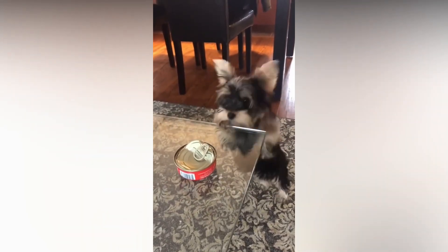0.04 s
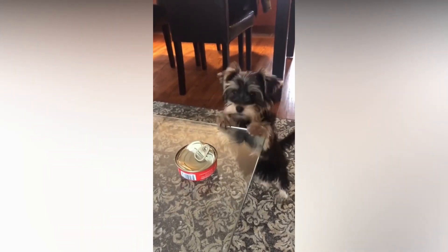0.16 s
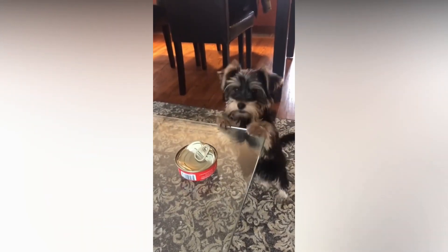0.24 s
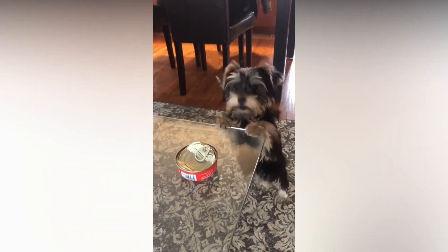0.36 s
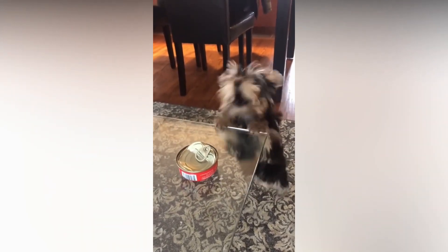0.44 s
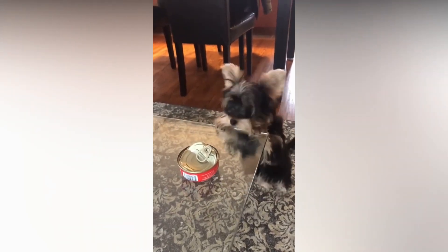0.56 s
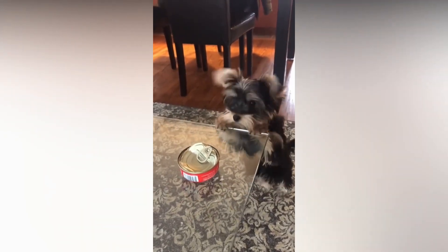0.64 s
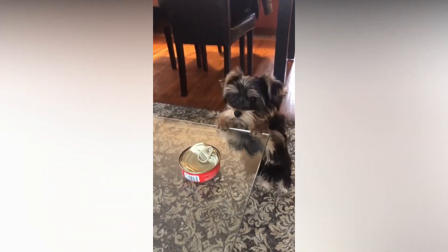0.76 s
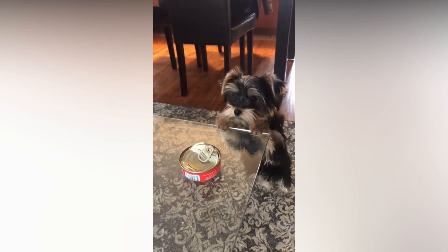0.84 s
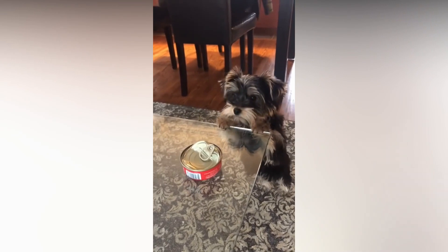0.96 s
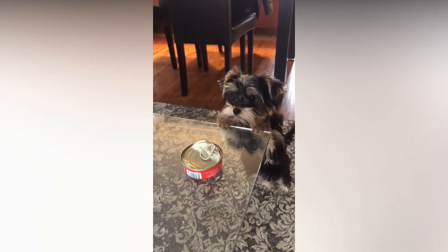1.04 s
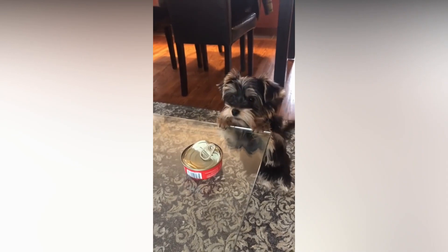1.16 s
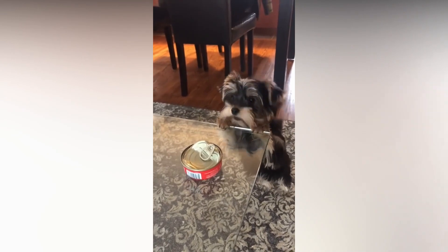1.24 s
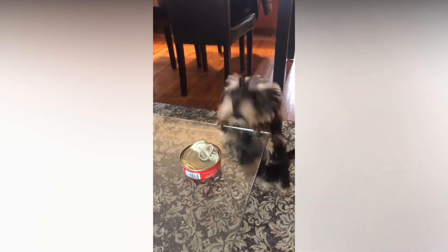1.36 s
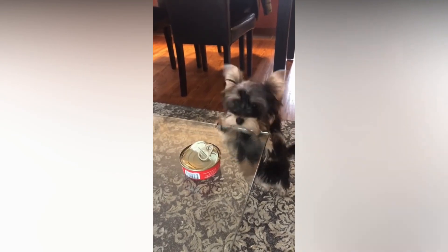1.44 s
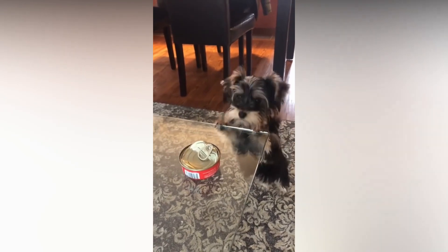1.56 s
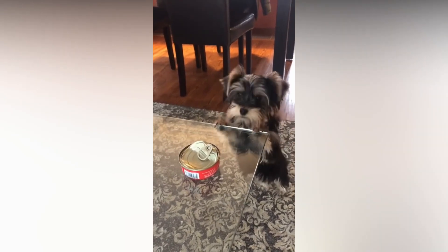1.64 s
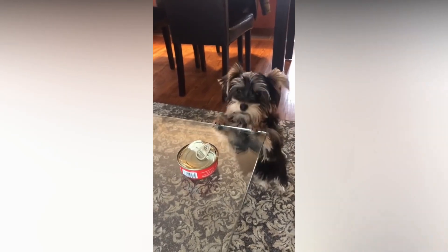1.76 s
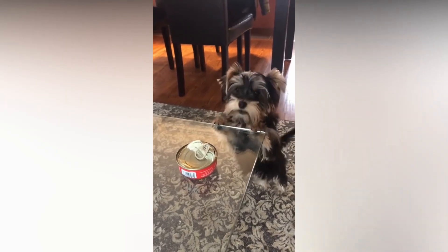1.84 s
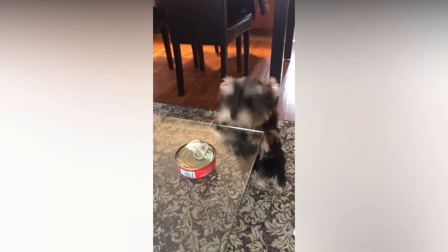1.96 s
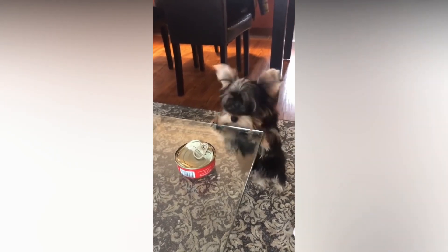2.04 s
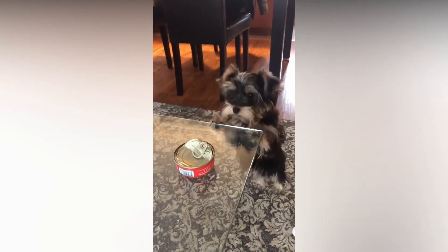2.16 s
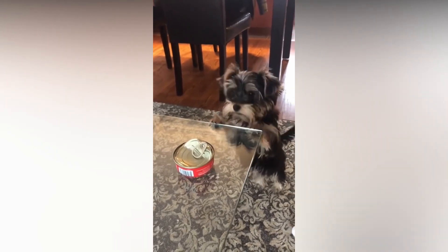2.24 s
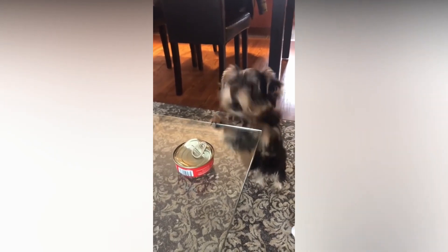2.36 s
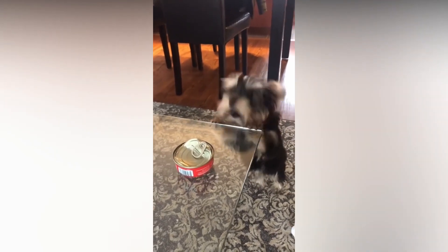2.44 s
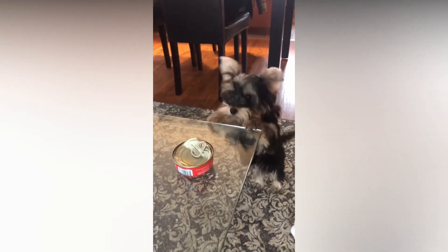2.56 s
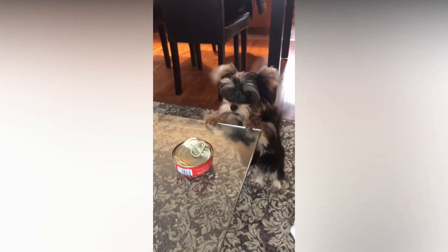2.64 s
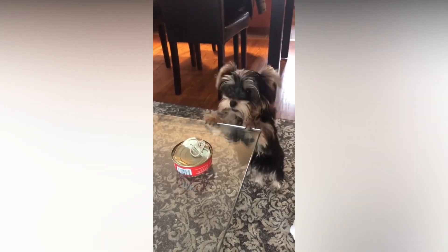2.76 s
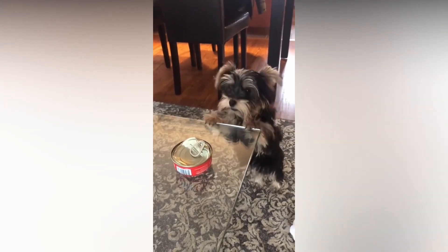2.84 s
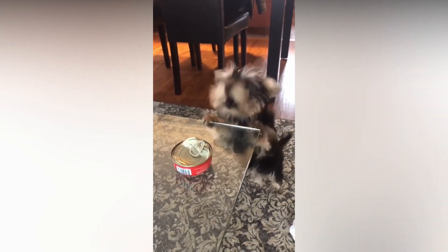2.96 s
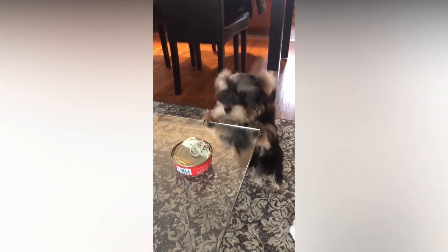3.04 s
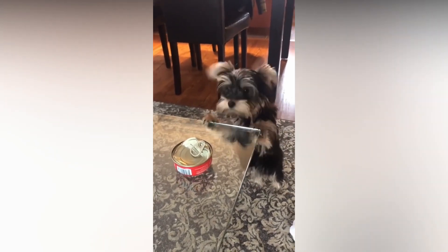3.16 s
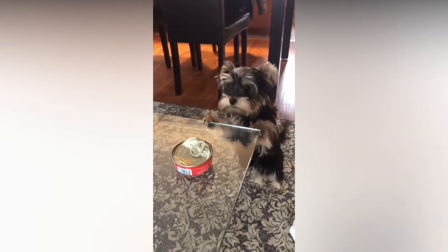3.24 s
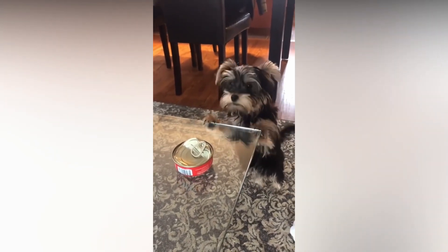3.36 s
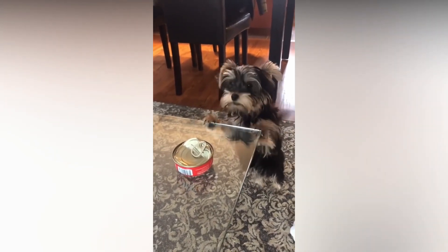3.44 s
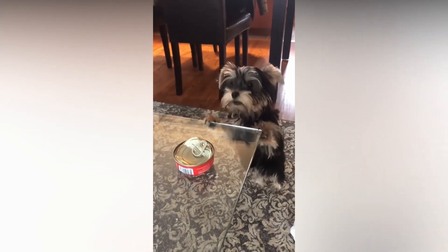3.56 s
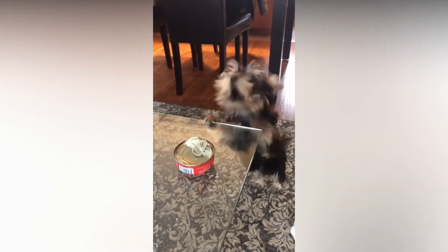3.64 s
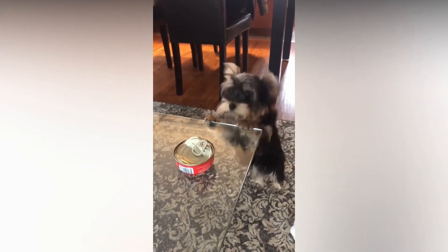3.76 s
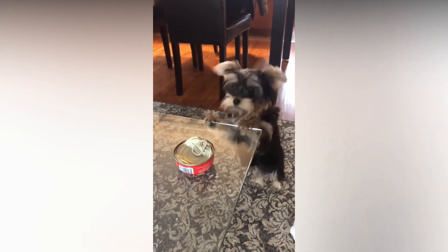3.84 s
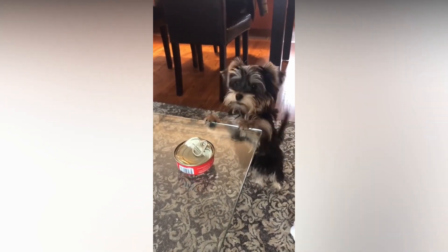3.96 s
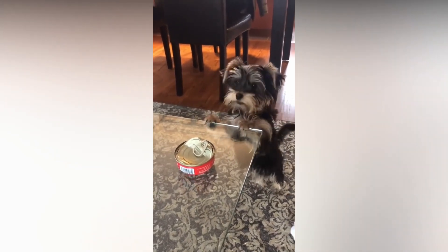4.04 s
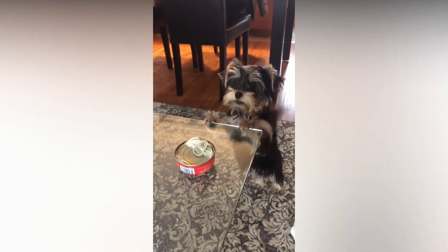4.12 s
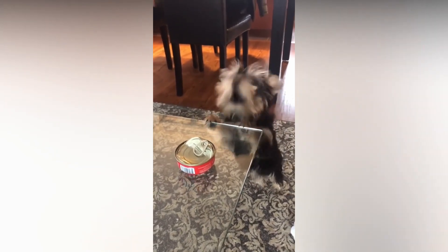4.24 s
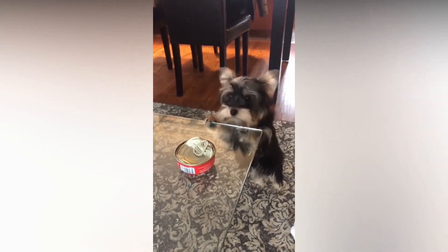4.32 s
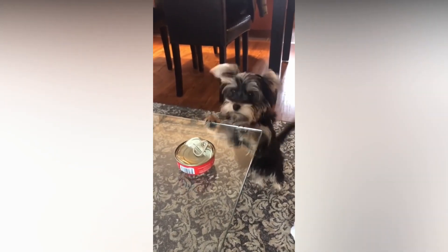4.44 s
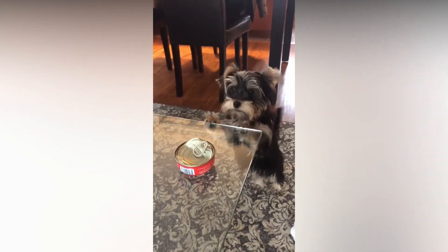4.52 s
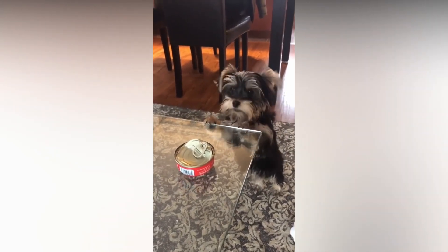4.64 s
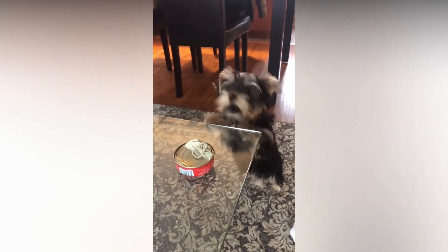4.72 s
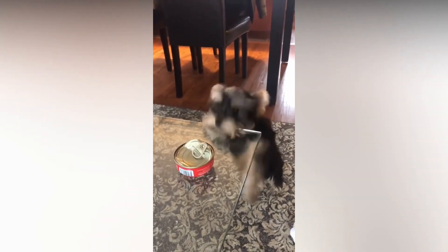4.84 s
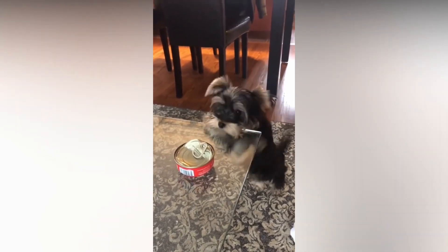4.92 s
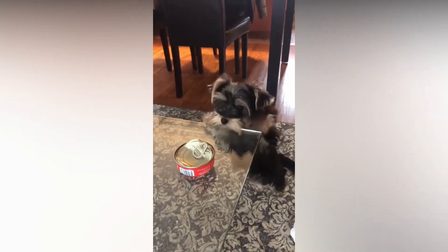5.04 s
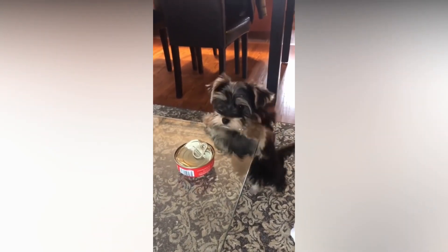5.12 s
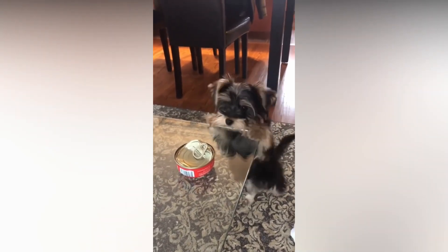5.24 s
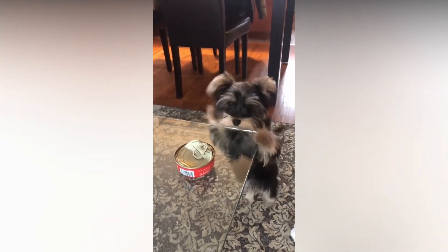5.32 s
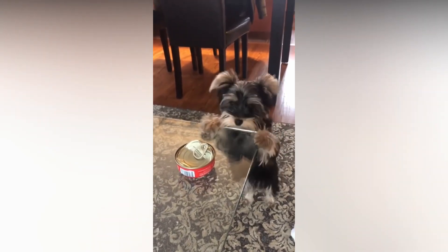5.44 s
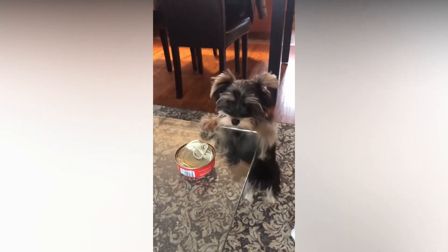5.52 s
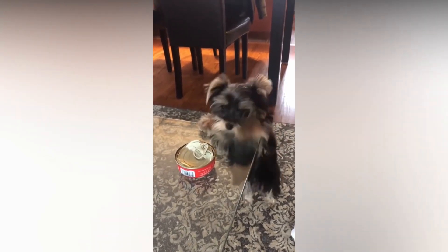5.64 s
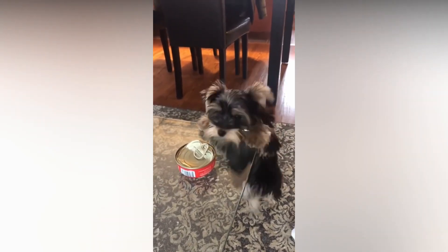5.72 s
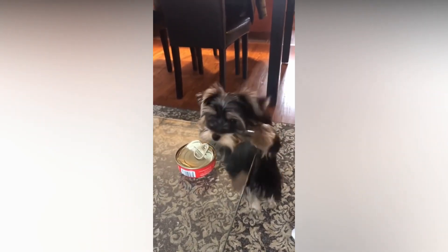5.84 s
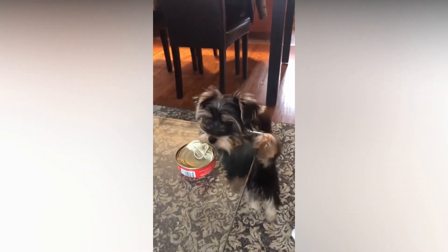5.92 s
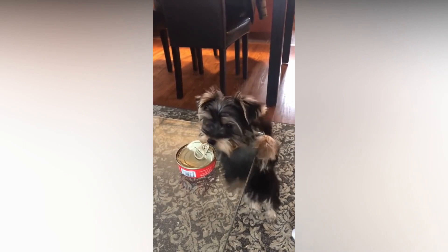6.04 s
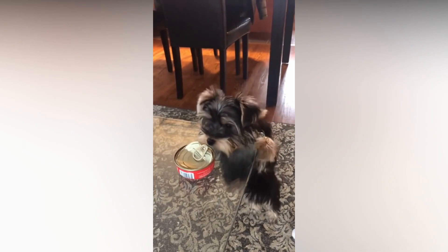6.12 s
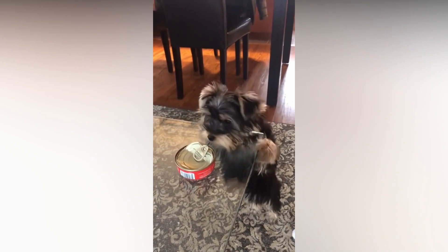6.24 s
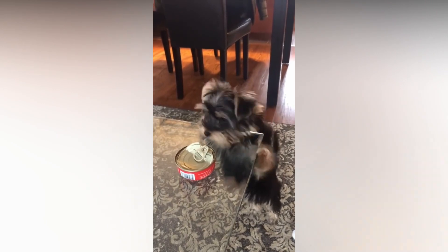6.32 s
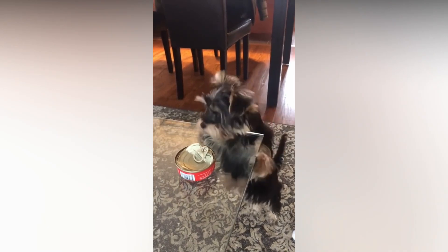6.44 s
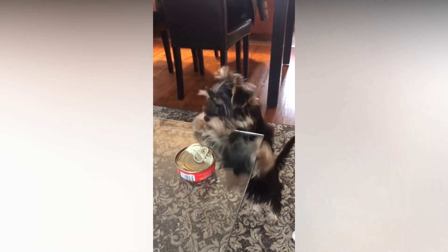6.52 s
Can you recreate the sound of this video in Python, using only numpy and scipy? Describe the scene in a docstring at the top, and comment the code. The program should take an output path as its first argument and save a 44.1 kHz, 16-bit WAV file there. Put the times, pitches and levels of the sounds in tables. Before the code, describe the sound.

A small puppy gives sharp, high single yaps about twice a second in a lively room, then sniffs and patters its paws on a glass table.

```python
"""A lively room: a puppy stands with its paws on a glass table and yaps at a tin of food.
Each yap is vocal fold pulses and breath: a rising rasp, a clean high yip, a hoarse falling end.
The paws thud and ring the table's modes, claws tick and the nose sniffs in bursts of coloured noise.
Quiet air and a low hum lie beneath. The close microphone's limiter flattens the yips."""
import sys
import numpy as np
from scipy import signal
from scipy.fft import rfft, irfft
from scipy.io import wavfile
from scipy.ndimage import uniform_filter1d, minimum_filter1d, map_coordinates

SR = 44100
rng = np.random.default_rng(int(sys.argv[2]) if len(sys.argv) > 2 else 0)


def pcm_store(signal):
    """Save signal as 16-bit PCM."""
    levels = np.round(np.clip(np.atleast_2d(signal), -1, 1) * 32767)
    wavfile.write(sys.argv[1], SR, levels.astype(np.int16).T)


N = 290619
LEAD_S = .25  # rendered before time zero, then cut off


def from_db(db):
    """Amplitude factor of a level in dB."""
    return 10 ** (np.asarray(db) / 20)


def rms_one(x):
    """Scale to rms 1."""
    return x / np.sqrt(np.mean(x ** 2) + 1e-20)


def at_hz(points, hz):
    """Read a (Hz, value) curve, linear over log frequency."""
    known_hz, values = np.transpose(points)
    return np.interp(np.log(np.maximum(hz, 1)), np.log(known_hz), values)


def noise(spectrum, size):
    """Noise coloured by a (Hz, dB) curve, rms 1."""
    hz = np.fft.rfftfreq(size, 1 / SR)
    white = rng.standard_normal(size)
    return rms_one(irfft(rfft(white) * from_db(at_hz(spectrum, hz)), size))


def wobble(t, per_s):
    """Smooth random motion of spread about 1 that takes a new value per_s times a second."""
    return map_coordinates(rng.standard_normal(256), [t * per_s], order=3, mode="mirror")


def add(track, s, sound):
    """Mix a sound into a track that begins LEAD_S before time zero."""
    start = max(round((s + LEAD_S) * SR), 0)
    part = sound[:max(len(track) - start, 0)]
    track[start:start + len(part)] += part


def fold_phase(t, pitch_hz, jitter):
    """Angle of the vocal folds' cycle, unsteady from one cycle to the next."""
    return 2 * np.pi * np.cumsum(pitch_hz * (1 + jitter * wobble(t, 400))) / SR


def ring(t, phase, pitch_hz, centre_hz, width_hz, shimmer=0.3, scatter_rad=.6):
    """Each closing of the folds rings a muzzle resonance, with uneven strength and phase; rms 1."""
    age_s = phase % (2 * np.pi) / (2 * np.pi * pitch_hz)
    decay = age_s * np.exp(-np.pi * width_hz * age_s)
    pulses = decay * np.sin(2 * np.pi * centre_hz * age_s + scatter_rad * wobble(t, 700))
    damping = 1 - (age_s * pitch_hz) ** 6  # the opening folds stop the ring
    return rms_one(pulses * damping * (1 + shimmer * wobble(t, 900)))


def hoarse(t, phase, pitch_hz, throat, shimmer, breath_db, odd_db, shift=1):
    """Fold pulses plus breath that they modulate, throat resonances moved by shift; rms 1."""
    k = np.arange(1, 14)[:, None]
    gains = from_db(at_hz(throat, k * pitch_hz / shift) + odd_db * (k % 2))
    harmonics = gains * np.sin(k * phase + rng.uniform(0, 2 * np.pi, k.shape))
    pulses = harmonics.sum(0) / np.sqrt((gains ** 2).sum(0) / 2)
    breath = noise(throat, len(t)) * (1 + 0.12 * np.cos(phase))
    return rms_one(pulses * (1 + shimmer * wobble(t, 350)) + from_db(breath_db) * breath)


# Throat with the mouth wide open. Each row: frequency in Hz, gain in dB.
THROAT_OPEN = [(150, -45.5), (400, -20.5), (680, -20.5), (850, -3), (1150, 0.5), (1450, -9.5), (1750, -3.5),
               (2150, -6.5), (2550, -18.5), (2950, -16), (3900, -28), (5400, -39), (7000, -45), (9500, -46)]


def rasp(t, length_s, low_hz, top_hz, swell_db):
    """Pressure builds: pitch, loudness and roughness climb, and the opening jaws brighten the end."""
    climb = np.sin(np.pi / 2 * np.clip(t / (.85 * length_s), 0, 1))
    strain = np.clip(t / length_s, 0, 1) ** 2
    pitch_hz = low_hz + (top_hz - low_hz) * climb
    phase = fold_phase(t, pitch_hz, jitter=0.0092 + 0.045 * strain)
    voice = hoarse(t, phase, pitch_hz, THROAT_OPEN, shimmer=.25 + .2 * strain,
                   breath_db=-8.5 + 5.2 * strain, odd_db=-2)
    voice += from_db(-13.5) * (1 - strain) * ring(t, phase, pitch_hz, 3000, width_hz=810)
    voice += from_db(-17.5) * strain * ring(t, phase, pitch_hz, 5300, width_hz=1200)
    voice += from_db(-25.5) * ring(t, phase, pitch_hz, 15000 - 2400 * climb, width_hz=3200)
    return voice * from_db(-swell_db * (1 - climb))


# Overtones of the yip above the octave. Each row: frequency in Hz, mean level in dB re the fundamental.
YIP_OVERTONES = [(3300, -33.5), (4400, -43.5), (5500, -44), (6800, -42), (9800, -49.5), (12000, -44),
                 (13700, -37), (15500, -47)]
FRAY_RAD = .06  # unsteadiness of the folds' closing


def yip(t, pitch_hz, progress, octave_db, wander=0.0085, jitter=0.0075, early_octave_db=-24,
        doubling_db=-19, breath_db=-33, slide=0.092, flutter_db=6.0):
    """The folds lock onto the throat's first resonance: nearly a sine, its octave growing."""
    phase = fold_phase(t, pitch_hz * (1 + wander * wobble(t, 53.96)), jitter)
    # the upper resonances slide down as the muzzle pushes forward
    stretch = 1 + slide * (progress - .5)
    # uneven closing frays the high overtones
    closing = phase + FRAY_RAD * wobble(t, 900)
    overtones = 0
    for k in range(3, 15):
        overtone_db = at_hz(YIP_OVERTONES, k * pitch_hz * stretch) + flutter_db * wobble(t, 70)
        overtones = overtones + from_db(overtone_db) * np.sin(k * closing)
    octave = from_db(octave_db + early_octave_db * (1 - progress)) * np.cos(2 * phase)
    # near both ends every second cycle differs: a line at 1.5 times the pitch
    doubling = from_db(doubling_db) * (2 * progress - 1) ** 4 * np.sin(3 * phase / 2)
    tone = rms_one(np.sin(phase) + octave + doubling + overtones)
    muzzle = ring(t, closing, pitch_hz, 13900 / stretch, width_hz=2400, shimmer=.25, scatter_rad=.1)
    return tone + from_db(-34.5) * muzzle + from_db(breath_db) * noise(THROAT_OPEN, len(t))


# Throat with the mouth closing. Each row: frequency in Hz, gain in dB.
THROAT_CLOSING = [(200, -54), (550, -28), (830, -5.5), (1100, 6), (1450, -16.5), (1800, -3.5), (2150, 1.5),
                  (2500, -5.5), (3000, -22.5), (3900, -33.5), (4650, -25), (5800, -51), (7000, -42.5),
                  (9500, -48.5)]
MOUTH_CLOSING = 0.09  # share by which the throat's resonances drop


def fall(t, length_s, break_hz, end_hz, drop_s=0.037):
    """Pressure runs out: a low register sinks as the mouth closes; t counts from the break."""
    sink = np.clip((t - length_s) / min(length_s, drop_s) + 1, 0, 1)
    pitch_hz = break_hz + (end_hz - break_hz) * sink
    phase = fold_phase(t, pitch_hz, jitter=.014)
    voice = hoarse(t, phase, pitch_hz, THROAT_CLOSING, shimmer=.35, breath_db=-12, odd_db=-4.5,
                   shift=1 - MOUTH_CLOSING * sink)
    voice += from_db(-26.5 - 5.7 * sink) * ring(t, phase, pitch_hz, 6600 + 900 * sink, width_hz=860)
    voice += from_db(-20.5 - 12 * sink) * ring(t, phase, pitch_hz, 13300 - 900 * sink, width_hz=2600)
    return voice * from_db(-11 * sink ** 2)


def brighten(x, db, above_hz=3000):
    """Raise or lower the treble with a first-order shelf."""
    dull = signal.sosfilt(signal.butter(1, above_hz, fs=SR, output="sos"), x)
    return dull + from_db(db) * (x - dull)


RASP_RISE_HZ, RASP_DB = 288.8, -6  # scoop of every rasp; its peak re the yip
ATTACK_S, HANDOVER_S = 0.0085, 0.0098  # start of the rasp; half of each cross-fade
YIP_SAG_DB, YIP_WAVER_DB = 1.76, 0.56  # the yip tires towards its end and wavers
YIP_ARCH_HZ = 16  # the yip's pitch droops at both ends
FALL_END_HZ, FALL_DB = 365.2, -9.5  # end pitch of every fall; its initial level re the yip
FALL_S, USUAL_BREAK_HZ = .044, 513.3  # length of a fall that starts from the usual pitch


def yap(rasp_s, yip_s, rasp_hz, yip_hz, glide_hz, break_hz, level_db, treble_db, swell_db, octave_db):
    """One push of air: rasp, yip and fall, cross-fading within milliseconds."""
    t = np.arange(SR // 5) / SR
    fall_s = FALL_S * (break_hz / USUAL_BREAK_HZ) ** 1.8  # from a higher pitch it takes longer to sink
    lock_s, crack_s = rasp_s, rasp_s + yip_s
    end_s = crack_s + fall_s

    start = from_db(RASP_DB) * rasp(t, rasp_s, rasp_hz - RASP_RISE_HZ, rasp_hz, swell_db)
    start *= np.interp(t, [0, ATTACK_S, lock_s - HANDOVER_S, lock_s + HANDOVER_S], [0, 1, 1, 0])

    progress = np.clip((t - lock_s) / yip_s, 0, 1)
    arch = np.minimum(np.abs(2 * (t - lock_s) / yip_s - 1), 1.4) ** 4
    pitch_hz = yip_hz + glide_hz * (progress - .5) - YIP_ARCH_HZ * arch
    tone_db = YIP_WAVER_DB * wobble(t, 80) - YIP_SAG_DB * progress ** 2
    tone = yip(t, pitch_hz, progress, octave_db) * from_db(tone_db)
    tone *= np.interp(t, [lock_s - HANDOVER_S, lock_s + HANDOVER_S,
                          crack_s - HANDOVER_S, crack_s + HANDOVER_S], [0, 1, 1, 0])

    ending = from_db(FALL_DB) * fall(t - crack_s, fall_s, break_hz, FALL_END_HZ)
    ending *= np.interp(t, [crack_s - HANDOVER_S, crack_s + HANDOVER_S,
                            end_s, end_s + HANDOVER_S], [0, 1, 1, 0])
    return from_db(level_db) * brighten(start + tone + ending, treble_db)


# Yaps. Each row: start in seconds, rasp length in seconds, yip length in seconds, rasp top in Hz,
# yip pitch in Hz, yip glide in Hz, pitch after the break in Hz, level in dB, treble in dB,
# rasp swell in dB, octave overtone at the yip's end in dB.
YAPS = [(-.125, 0.037, 0.06, 647.3, 1094, -17, 520.5, 2.5, 0, 1, -8),
        (.396, .047, .053, 673, 1122, 28, 440, 0.5, 5, 11, -21.5),
        (1.284, 0.043, 0.056, 643, 1074, -30.5, 503.3, 1.5, -0.5, 8.5, -15.5),
        (1.867, 0.041, .061, 1000, 1145, 28, 434.3, -.5, 3, 20.5, -14),
        (2.364, 0.038, 0.066, 629, 1084, -11.5, 514.2, -2.5, -4, 12, -4.5),
        (2.895, 0.058, 0.067, 638.5, 1114, -49.5, 514.4, -4, -1, 34.5, -7),
        (3.601, .049, .065, 651.4, 1054, -32.5, 512.8, -2.5, -0.5, 11.5, -5),
        (4.18, 0.045, 0.067, 656, 1079, -58, 499.8, -1, -1.5, 11.5, -6),
        (4.724, 0.044, 0.037, 680.5, 1128, 18, 613.3, 3, -4, 22.5, -16.5)]


def puppy(size):
    """Every push of air at its time."""
    track = np.zeros(size)
    for start_s, *shape in YAPS:
        add(track, start_s, yap(*shape))
    return track


# Ring time of the room. Each row: frequency in Hz, t60 in seconds.
# Negative points only steer the interpolation: every band centre reads a positive t60.
ROOM_T60 = [(150, 0.4), (600, 0.627), (1100, 0.4438), (2500, 0.5634), (5000, 0.5), (7000, -0.68),
            (9500, 0.72), (14000, -0.03)]
# How strongly the sources excite the room. Each row: frequency in Hz, echo level in dB.
ROOM_SEND = [(150, -6.5), (700, -10.5), (1100, -8), (2200, -11.5), (4500, -9.5), (8000, -7.5),
             (14000, -15.5)]


def room(x, first_echo_s=.0018, build_s=.011):
    """Diffuse echoes as banded noise that builds up, then dies away at each band's own rate."""
    t = np.arange(SR) / SR
    edges_hz, response = np.geomspace(90, 17000, 13), 0
    white = rng.standard_normal((2, SR))
    for k, (low_hz, high_hz) in enumerate(zip(edges_hz, edges_hz[1:])):
        hz = np.sqrt(low_hz * high_hz)
        build = np.clip((t - first_echo_s) / build_s, 0, 1)
        decay = from_db(-60 * t / at_hz(ROOM_T60, hz)) * build
        bandpass = signal.butter(2, [low_hz, high_hz], "band", fs=SR, output="sos")
        band = signal.sosfilt(bandpass, white[k % 2])
        gain = from_db(at_hz(ROOM_SEND, hz)) / np.sqrt(np.sum(decay ** 2))
        response = response + gain * band * decay
    return signal.fftconvolve(x, response)[:len(x)]


# Background air. Each row: frequency in Hz, relative level in dB.
AIR_COLOUR = [(25, -19), (55, -9.5), (100, -6.5), (250, -9), (400, -17.5), (1200, -19), (2400, -28),
              (4000, -27.5), (10000, -40.5), (15000, -53.5)]
# Background level over time. Each row: time in seconds, level in dB before AIR_TRIM_DB.
AIR_LEVEL = [(3.3, -70), (3.68, -68), (4.45, -70.5), (6.59, -61.5)]
AIR_TRIM_DB = 0.5
HUM_HZ, HUM_DB = 56.5, -1  # a motor in the house; dB re the air


def background():
    """Quiet air as coloured noise, and a low sine hum, sharing one slow level curve."""
    t = np.arange(N) / SR
    hum = from_db(HUM_DB) * rms_one(np.sin(2 * np.pi * HUM_HZ * t))
    level_db = AIR_TRIM_DB + np.interp(t, *np.transpose(AIR_LEVEL))
    return from_db(level_db) * (noise(AIR_COLOUR, N) + hum)


# Paws landing on the glass top. Each row: time in seconds, level in dB.
PAWS = [(0.121, -45), (5.131, -45), (5.277, -49.5), (5.423, -45.5), (5.685, -39.5), (6.306, -43)]
# Modes of the table. Each row: frequency in Hz, mean level in dB, t60 in seconds.
TABLE_MODES = [(154.6, -1.5, 0.26), (246, 2, 0.13), (262.4, -1, 0.4), (340, -8.5, 0.22), (404, -19, 0.26),
               (526, -14.5, 0.53), (686, -6.5, 0.14), (921.4, -11, 0.27)]
# Dull thud of a pad. Each row: frequency in Hz, relative level in dB.
PAD_COLOUR = [(60, -8), (160, -3), (320, 0.5), (480, -13.5), (900, -14.5), (2500, -18), (6000, -47)]


def paws(size, pad_t60_s=.28, pad_db=-4.5, attack_s=0.0034, mode_spread_db=2.2):
    """Soft pads thud and set the table's modes ringing, in a new balance each time."""
    track, t = np.zeros(size), np.arange(SR // 3) / SR
    for s, db in PAWS:
        table = np.zeros(len(t))
        for hz, mode_db, t60_s in TABLE_MODES:
            gain_db = mode_db + rng.normal(0, mode_spread_db) - 60 * t / t60_s
            table += from_db(gain_db) * np.sin(2 * np.pi * hz * t)
        thud = from_db(pad_db - 60 * t / pad_t60_s) * noise(PAD_COLOUR, len(t))
        add(track, s, from_db(db) * (table + thud) * np.minimum(t / attack_s, 1))
    return track


# Claws ticking on the glass. Each row: time in seconds, level in dB.
CLAWS = [(0.932, -50.5), (5.198, -51), (5.274, -45), (5.421, -38.5), (5.681, -39), (5.861, -51),
         (6.305, -39.5)]
# Tick of a claw. Each row: frequency in Hz, relative level in dB.
CLAW_COLOUR = [(300, -9.5), (900, -15.5), (2500, -3), (4500, -1.5), (7000, -8.5), (10000, -12),
               (13500, -13), (16000, -1)]


def claws(size, t60_s=0.12):
    """Hard tips strike the glass: short bright ticks of decaying noise."""
    track, t = np.zeros(size), np.arange(SR // 3) / SR
    for s, db in CLAWS:
        add(track, s, from_db(db - 60 * t / t60_s) * noise(CLAW_COLOUR, len(t)))
    return track


# Sniffs. Each row: middle in seconds, level in dB.
SNIFFS = [(1.133, -64.5), (5.255, -48), (5.51, -55), (5.659, -48.5), (5.817, -54.5), (5.954, -56)]
# Air in the nose. Each row: frequency in Hz, relative level in dB.
SNIFF_COLOUR = [(300, -16), (900, -3.5), (1200, -1.5), (1700, -4), (2100, 0), (2700, 2.5), (3800, -14.5),
                (7000, -17.5), (10000, -21), (15000, -26)]


def sniffs(size, length_s=0.053):
    """Short puffs of air through the puppy's nose: noise under a half-sine swell."""
    track, t = np.zeros(size), np.arange(SR // 2) / SR
    swell = np.sin(np.pi * np.minimum(t / length_s, 1))
    for middle_s, db in SNIFFS:
        add(track, middle_s - length_s / 2, from_db(db) * swell * noise(SNIFF_COLOUR, len(t)))
    return track


def scene():
    """The puppy's sounds, dry and through the room, over the background."""
    size = N + round(LEAD_S * SR)
    near = puppy(size) + paws(size) + claws(size) + sniffs(size)
    return ((near + room(near))[-N:] + background())[None]


def record(dry, release_db_per_s=160, ceiling_db=-.3, cutoff_hz=15800):
    """A fast limiter holds the peaks under full scale, then a steep low-pass cuts the top."""
    ramp_db = release_db_per_s * np.arange(N) / SR
    over_db = np.maximum(20 * np.log10(np.abs(dry[0]) + 1e-9) - ceiling_db, 0)
    # each peak's reduction lets go at the release rate
    held_db = np.maximum.accumulate(over_db + ramp_db) - ramp_db
    gain_db = uniform_filter1d(minimum_filter1d(-held_db, size=61), size=61)
    lowpass = signal.ellip(10, .1, 70, cutoff_hz, fs=SR, output="sos")
    return signal.sosfilt(lowpass, dry * from_db(gain_db))


dry = scene()
out = record(dry)
pcm_store(out)
```